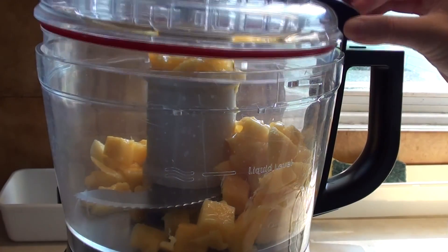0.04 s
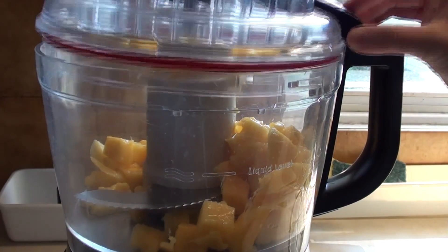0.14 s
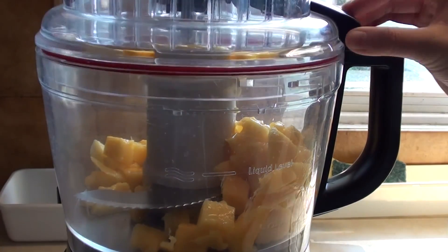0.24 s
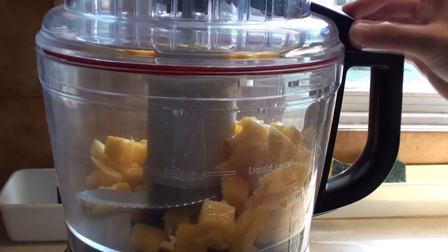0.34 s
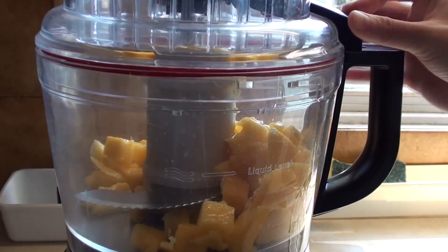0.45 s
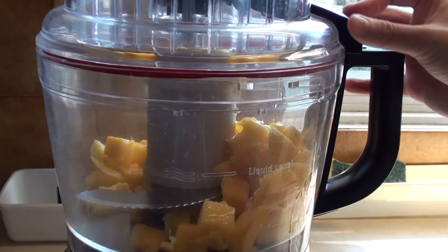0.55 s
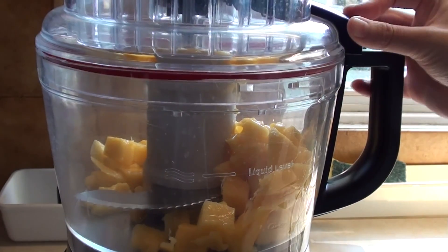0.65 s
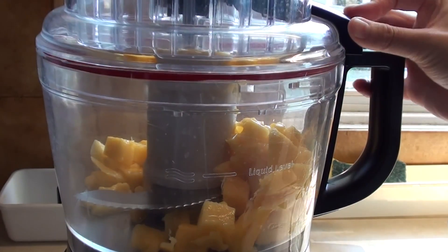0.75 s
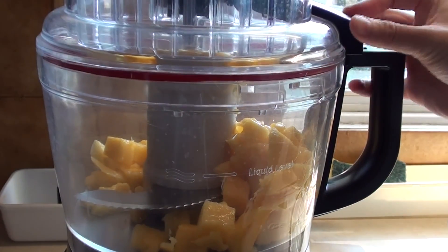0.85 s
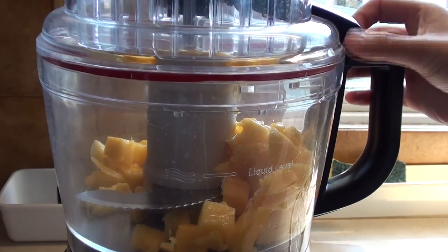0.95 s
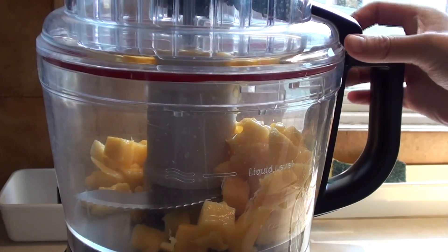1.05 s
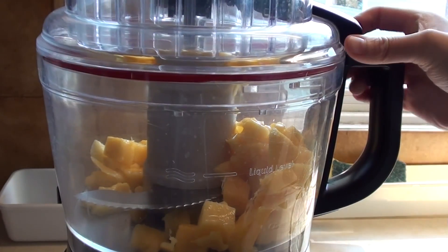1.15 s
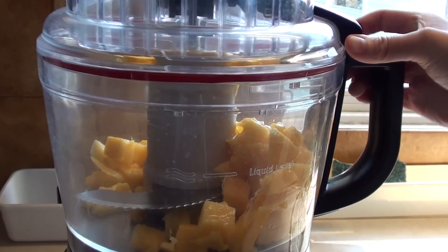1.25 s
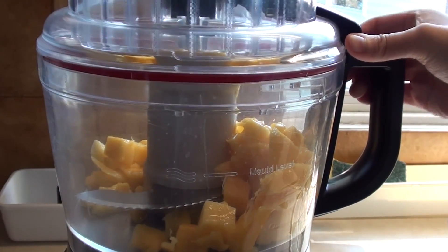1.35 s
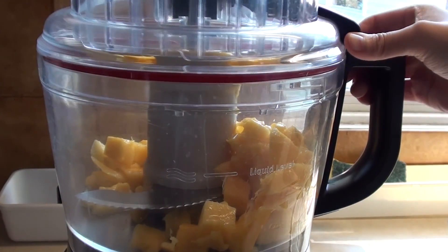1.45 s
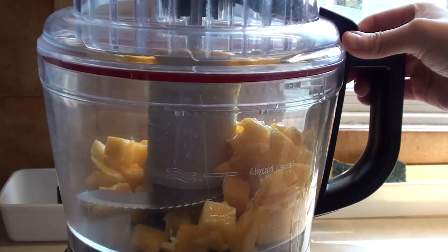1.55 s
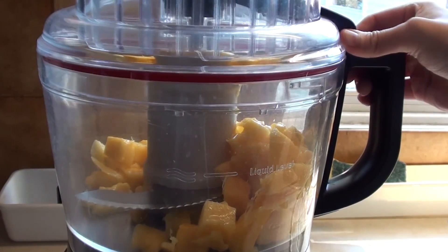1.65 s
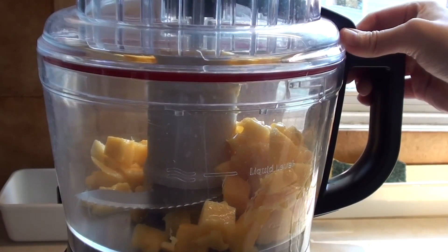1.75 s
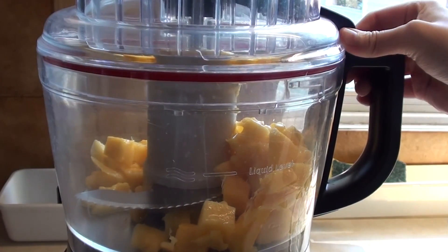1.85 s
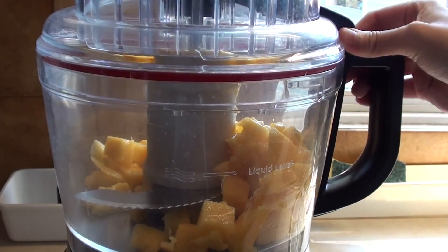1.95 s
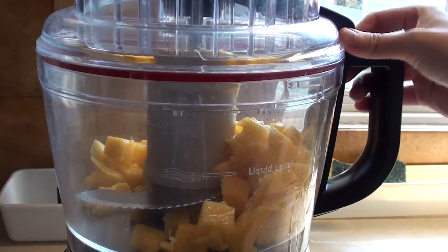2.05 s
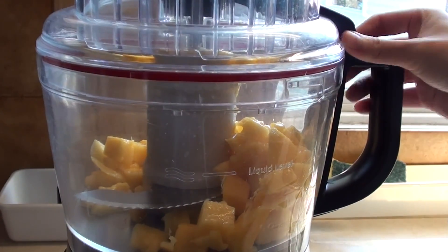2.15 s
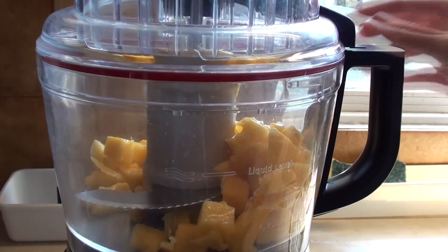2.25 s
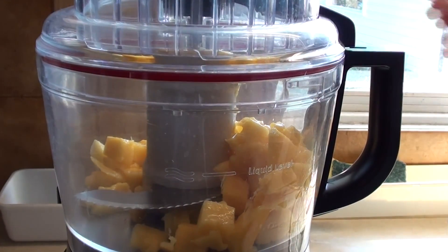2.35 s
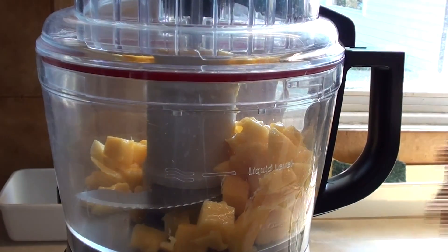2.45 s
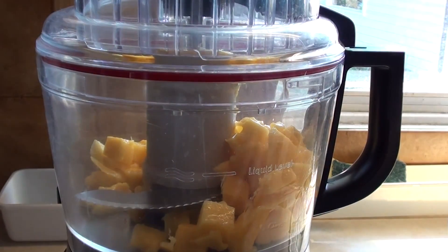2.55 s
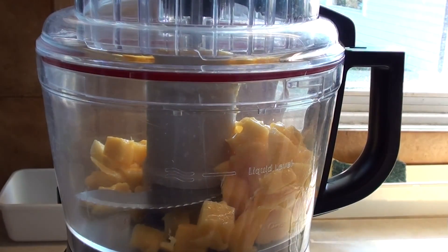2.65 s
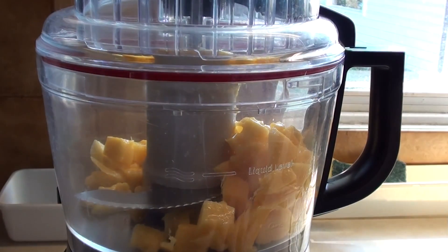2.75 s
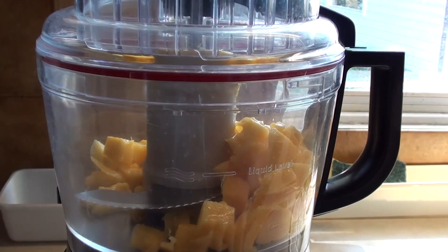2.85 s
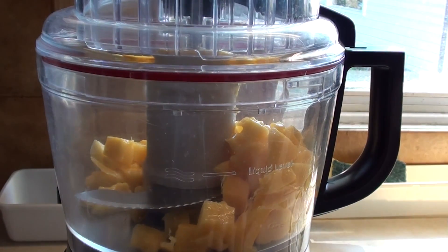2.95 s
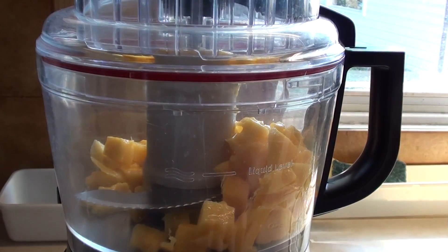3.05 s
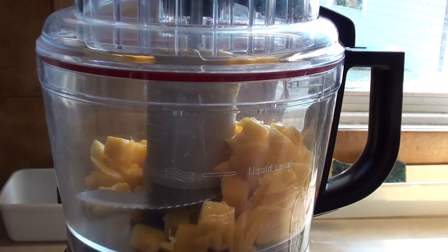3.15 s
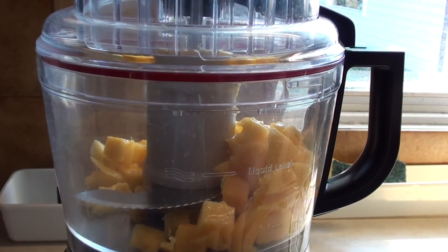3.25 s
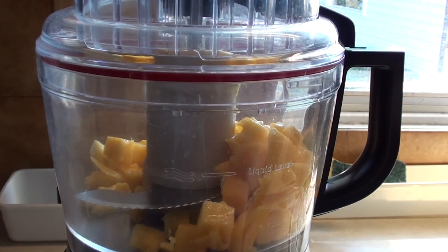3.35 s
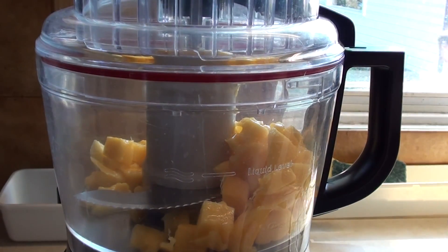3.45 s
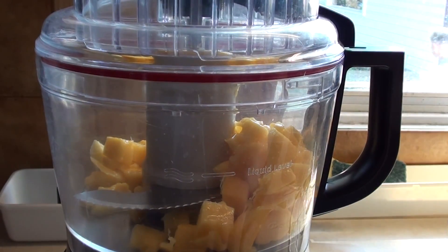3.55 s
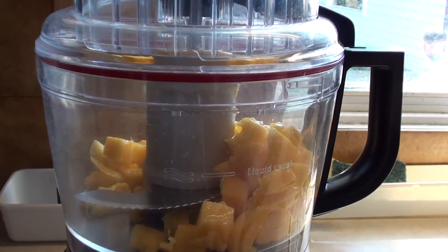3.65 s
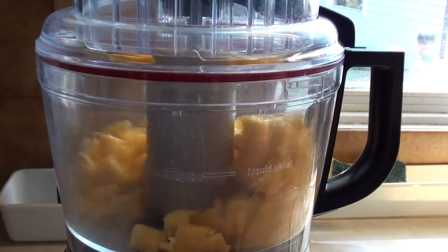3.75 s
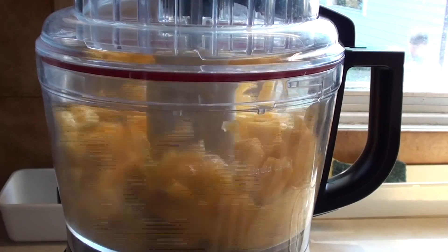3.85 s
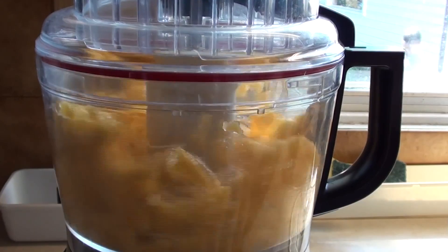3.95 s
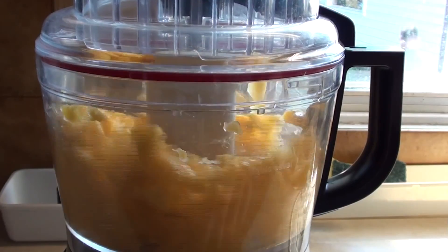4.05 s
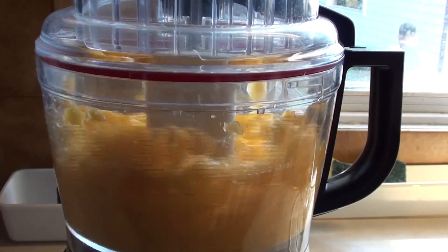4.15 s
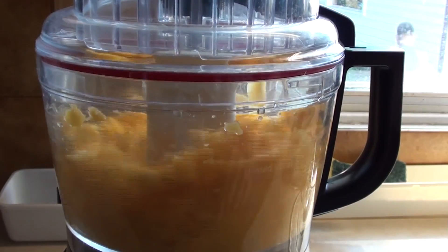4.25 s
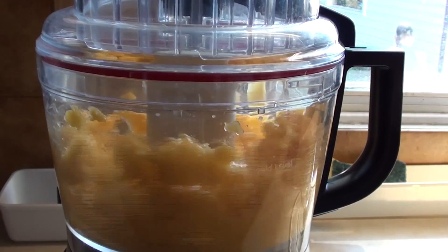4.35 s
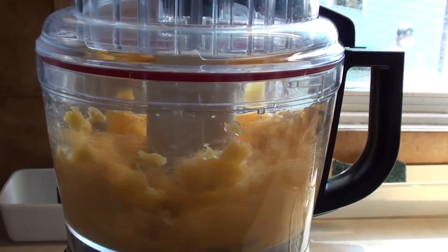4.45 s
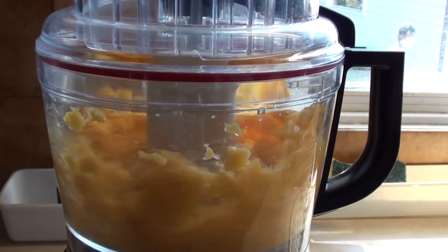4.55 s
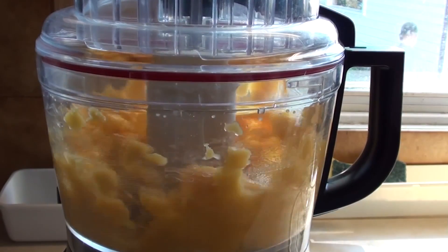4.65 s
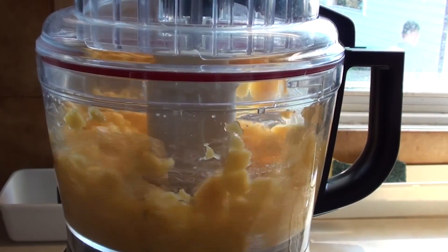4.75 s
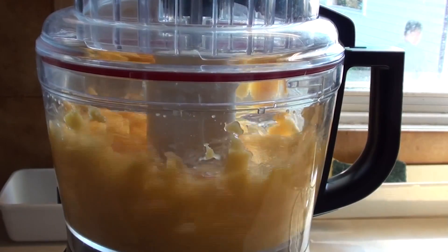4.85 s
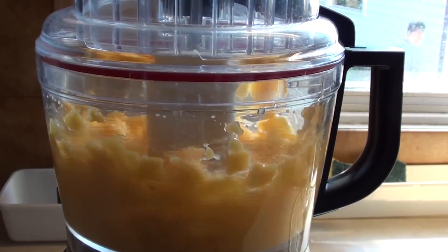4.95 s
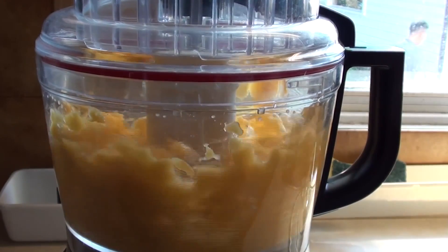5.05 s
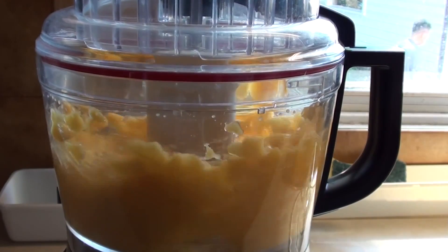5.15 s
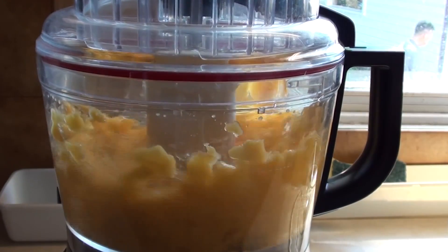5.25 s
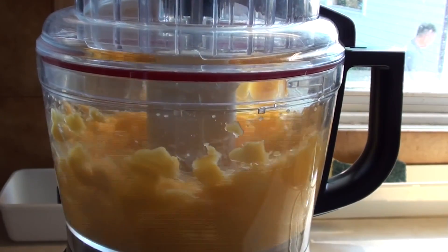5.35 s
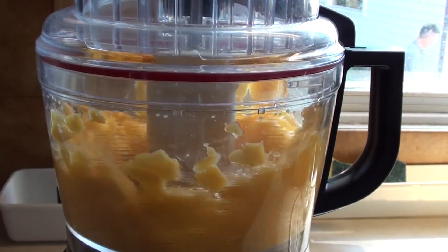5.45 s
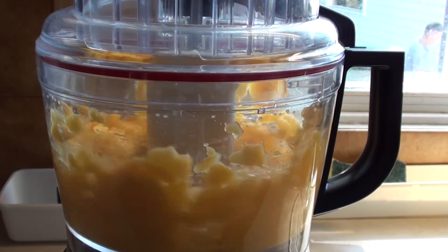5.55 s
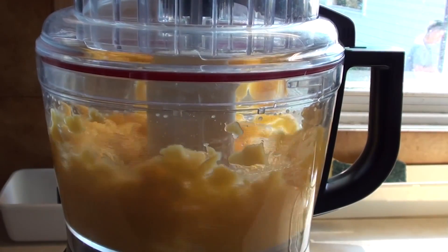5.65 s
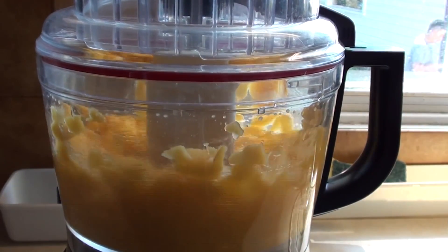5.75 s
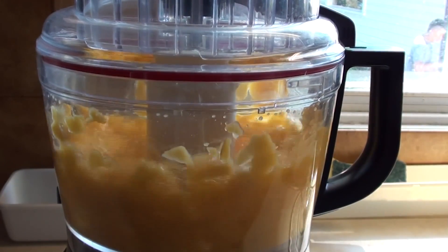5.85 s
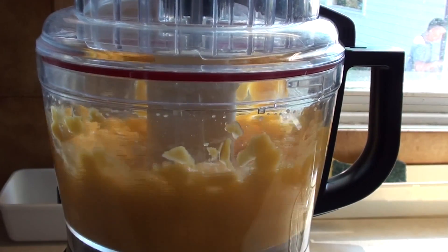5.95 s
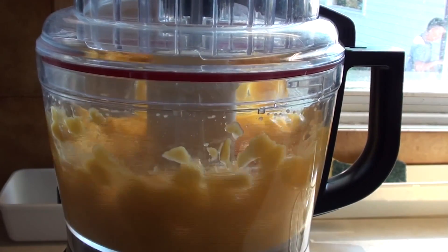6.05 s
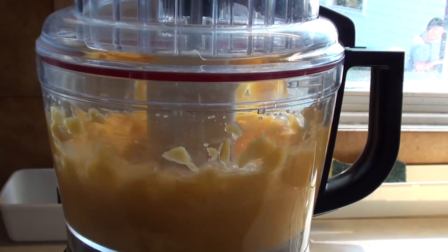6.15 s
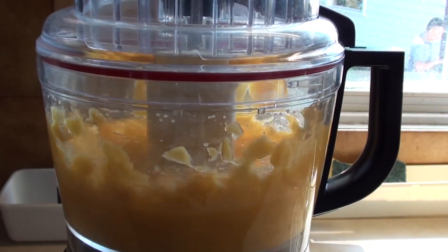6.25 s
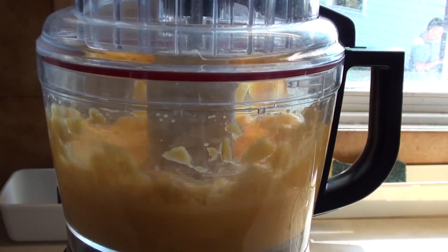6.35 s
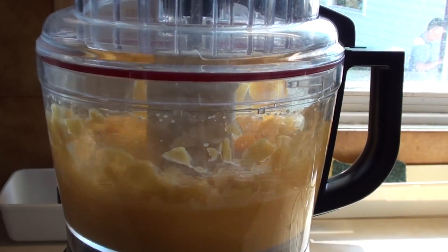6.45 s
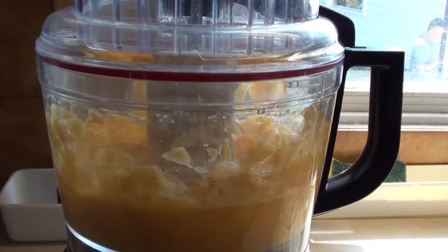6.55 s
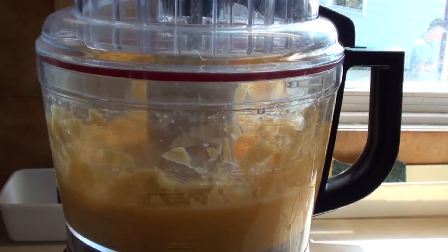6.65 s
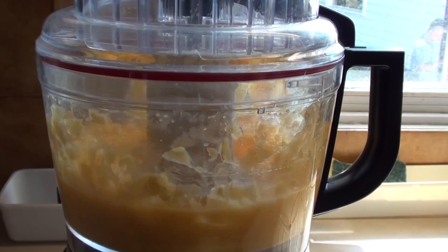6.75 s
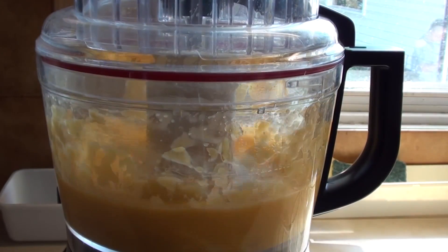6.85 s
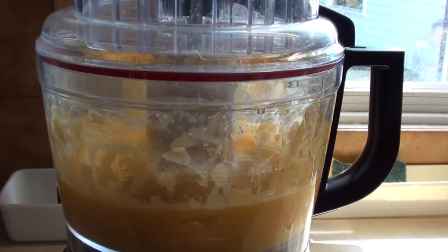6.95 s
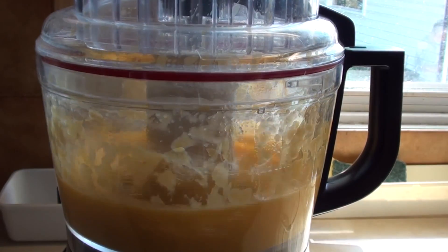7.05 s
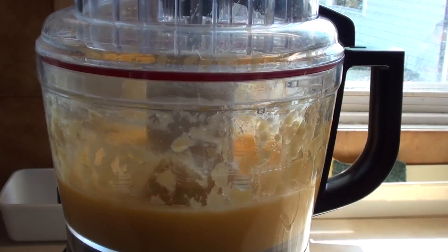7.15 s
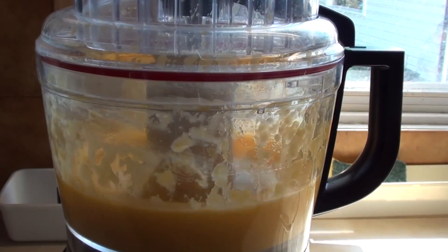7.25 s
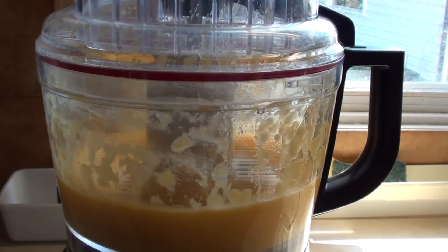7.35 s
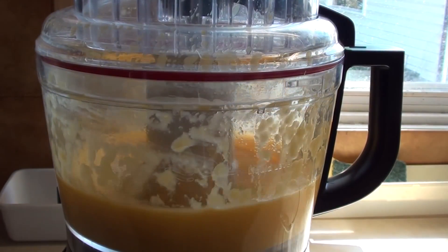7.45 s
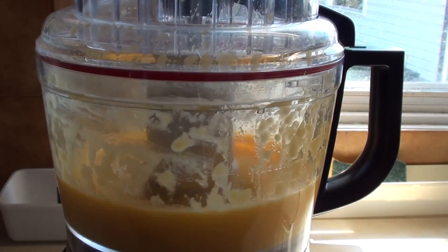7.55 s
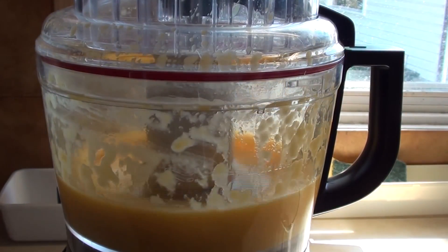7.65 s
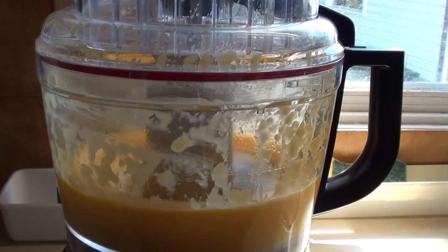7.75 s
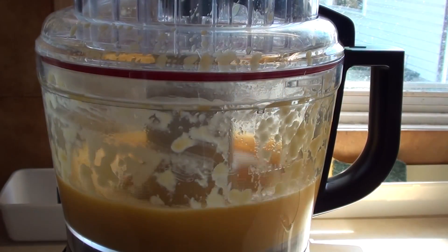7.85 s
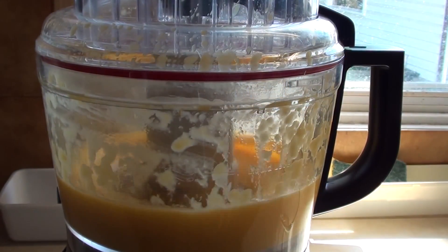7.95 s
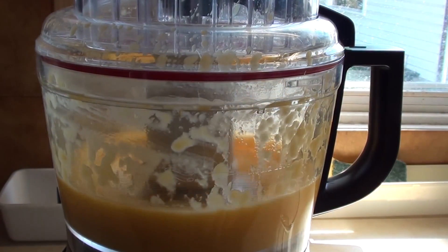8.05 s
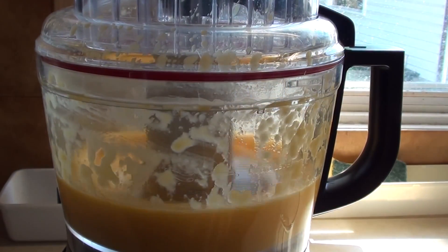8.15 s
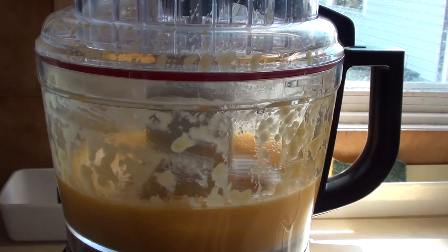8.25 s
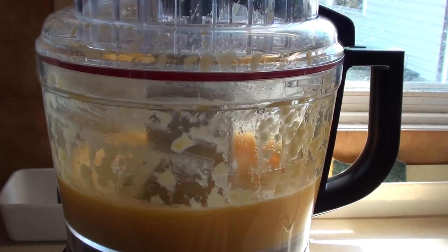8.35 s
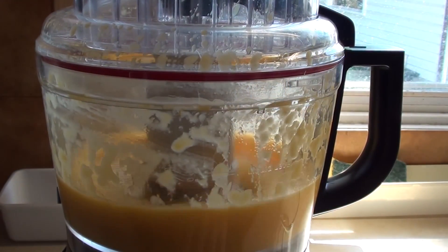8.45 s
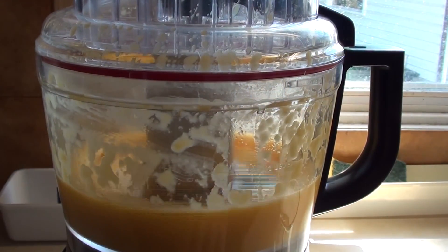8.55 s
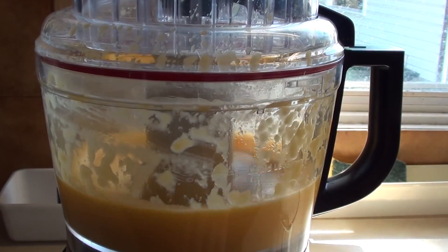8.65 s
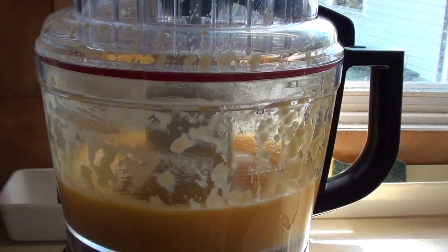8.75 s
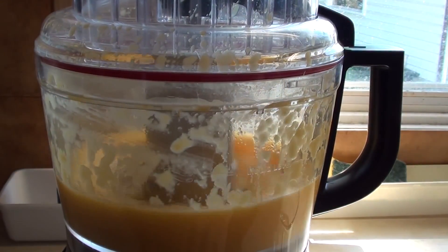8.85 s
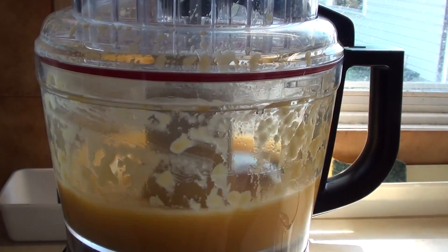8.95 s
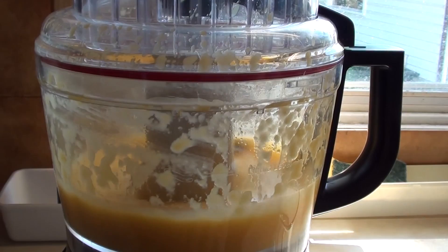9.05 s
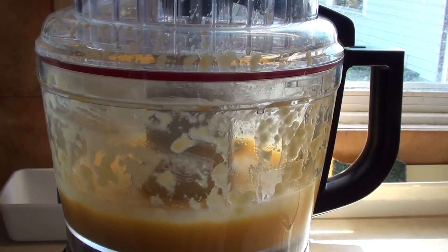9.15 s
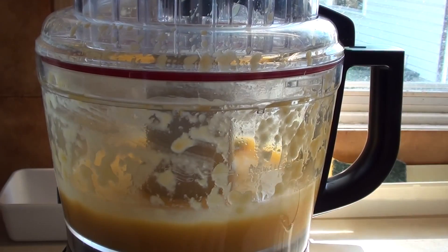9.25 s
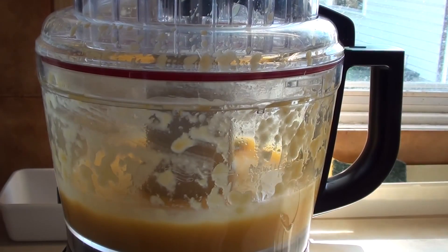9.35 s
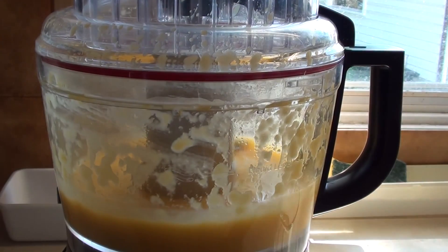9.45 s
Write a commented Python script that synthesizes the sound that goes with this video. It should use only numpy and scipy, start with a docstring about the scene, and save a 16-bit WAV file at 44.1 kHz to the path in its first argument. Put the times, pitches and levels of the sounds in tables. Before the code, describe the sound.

Irregular sharp plastic knocks and hollow bowl rings come first, with pauses, over faint room hiss. A dull button click starts a steady food processor motor, its fuzzy belt whine and metallic rasp mixed with lumpy wet churning and small squelches. The fruit liquefies and the sound becomes smoother and more rhythmic before a brief coast-down, light clacks and a soft swish, closely miked in a small kitchen.

```python
"""A food processor on a kitchen counter, heard by close microphones over faint room hiss.
First the hard plastic lid rubs, knocks, twists and latches (noise crunches, ringing bowl and tab); a hand swishes.
A button thumps the base, then for five seconds a motor hums in steady sines and drives the blade by a toothed belt:
a fuzzy harmonic whine and rasping metal, while noise splats of fruit chunks and gliding squelches turn to puree wash.
The drive runs down with a few clacks and the puree settles with a last soft swish."""
import sys
import numpy as np
from scipy import signal
from scipy.fft import rfft, irfft
from scipy.io import wavfile
from scipy.ndimage import uniform_filter1d

SR = 44100
rng = np.random.default_rng(int(sys.argv[2]) if len(sys.argv) > 2 else 0)


def output_pcm(signal):
    """Save a mono or channel-first signal as 16-bit PCM at the path in sys.argv[1].

    Samples are clipped to [-1, 1] before scaling.
    """
    pcm = np.clip(np.atleast_2d(signal).T, -1, 1) * 32767
    wavfile.write(sys.argv[1], SR, np.round(pcm).astype(np.int16))


N = 419391
TIME = np.arange(N) / SR  # s

ON_S, OFF_S, COAST_S = 3.75, 8.85, .39  # motor current on and off, then the time the drive takes to stop
BELT_TEETH = 43  # in one loop of the belt


def amp(db):
    """Decibels to amplitude."""
    return 10 ** (np.asarray(db) / 20)


def unit(x):
    """Scales a signal to an RMS of one."""
    return x / np.sqrt(np.mean(x ** 2) + 1e-20)


def at_hz(points, hz):
    """Reads a table on a log-frequency axis."""
    f, value = np.transpose(points)
    return np.interp(np.log(hz + 1), np.log(f + 1), value)


def curve(rows):
    """Reads a time table at every sample."""
    return np.interp(TIME, *np.transpose(rows))


def between(on, off, rise, fall):
    """A gate with sloping ends; all in seconds."""
    opening = np.clip((TIME - on) / rise, 0, 1)
    closing = np.clip((off - TIME) / fall, 0, 1)
    return opening * closing


def add(mix, s, sound):
    """Lays a short sound into the mix at s seconds."""
    part = mix[max(round(s * SR), 0):][:len(sound)]
    part += sound[:len(part)]


def wander(hz):
    """Slow random drift of unit RMS, low-passed near hz."""
    f = np.fft.rfftfreq(N, 1 / SR)
    spectrum = rfft(rng.standard_normal(N)) / (1 + (f / hz) ** 4)
    return unit(irfft(spectrum, N))


def colour(x, points, peaks=(), size=8192):
    """Causal minimum-phase filter: a broad spectrum plus resonances, brought to unit RMS."""
    f = abs(np.fft.fftfreq(size, 1 / SR))
    power = amp(at_hz(points, f)) ** 2
    for hz, width, db in peaks:
        power = power + amp(db) ** 2 / (1 + ((f - hz) / width) ** 2 * 2) ** 2
    log_gain = np.log(power + 1e-12) / 2
    taps = np.fft.ifft(np.exp(np.conj(signal.hilbert(log_gain)))).real
    return unit(signal.oaconvolve(x, taps[:size // 2])[:N])


def ring(modes):
    """Half a second of dying sines, each with its own pitch, level and t60."""
    t = TIME[:SR // 2]
    return sum(amp(db - 60 * t / t60) * np.sin(2 * np.pi * hz * t) for hz, db, t60 in modes)


def no_deep_bass(x):
    """The rubber feet of the base pass no deep bass: a high-pass at 175 Hz."""
    return signal.sosfilt(signal.butter(4, 175, "high", fs=SR, output="sos"), x)


def room_tone(level_db=-55, side_db=-15):
    """Faint hiss, nearly alike in both ears; its amplitude halves from 3.75 to 9.1 s."""
    # hiss of the room: f/Hz, level/dB per Hz
    hiss = [(20, -24), (60, -10), (100, -5), (160, 0), (260, 0), (600, 0), (1000, -1.5), (2000, -3.5),
            (5000, -7.5), (9000, -10), (13000, -11.5), (16000, -13)]
    side_hiss = [(30, -51), (200, -31), (1500, -20), (6000, -35), (9000, -59)]
    mid = colour(rng.standard_normal(N), hiss)
    side = amp(side_db) * colour(rng.standard_normal(N), side_hiss)
    dip = 1 - .5 * between(3.75, 9.1, .02, .02)
    return amp(level_db) * np.array([mid + side, mid - side]) * dip


def kitchen(x, wet_db, side_db):
    """Sparse reflections dying band by band; the close microphones hardly differ in the top octave."""
    # reverberation of the kitchen: f/Hz, t60/s
    room_t60 = [(150, 0.49), (500, 0.44), (1500, 0.38), (4000, 0.34), (7500, 0.36), (11000, 0.22),
                (16000, 0.21)]
    signs = rng.choice([-1., 1.], (2, SR))
    taps = signs * (rng.random((2, SR)) < 3000 / SR) * np.clip(TIME[:SR] / 0.012, 0, 1)
    hz, t, z = signal.stft(taps, SR, nperseg=256)
    decay = amp(-60 * t / at_hz(room_t60, hz)[:, None])
    tails = signal.istft(z * decay, SR, nperseg=256)[1]
    tails = tails / np.linalg.norm(tails[0])
    near = rng.standard_normal(SR // 100) * np.exp(-TIME[:SR // 100] / 0.0033)
    near = near / np.linalg.norm(near)
    wet, apart = amp(wet_db) * signal.oaconvolve(x[None], tails, axes=1)[:, :N]
    side = 0.45 * apart + amp(side_db) * signal.oaconvolve(x, near)[:N]
    side = signal.sosfilt(signal.butter(8, 8300, fs=SR, output="sos"), side)
    # the ears differ less in the bass
    side = side - 0.55 * signal.sosfilt(signal.butter(1, 600, fs=SR, output="sos"), side)
    return np.array([x + wet + side, x + wet - side])


def rim(db=-30, fade=0.051):
    """The lid rubs down into its seat: dying noise through the resonances of its rim."""
    # the lid's rim sliding onto the bowl: f/Hz, width/Hz, level/dB
    rim_peaks = [(396, 63, -4.5), (535, 41, -7), (595, 50, -7), (670, 50, -15), (830, 48, -17),
                 (997, 31, -4.5), (1330, 110, -19)]
    rub_colour = [(60, -24), (300, -11.5), (1500, -21.5), (2500, -34.5), (6000, -53), (16000, -70)]
    rub = colour(rng.standard_normal(N), rub_colour, rim_peaks)
    return amp(db) * rub * np.exp(-TIME / fade) * between(0, 0.097, 0.00067, .02)


def plastic(after_db=(-10, -11, -17, -22), after_t60=(.11, .10, .06, .035),
            trim_db=(0, -6.8, -2, 3), bowl_db=-15, counter_db=-27):
    """Each contact crunches, then the shell buzzes densely; the bowl rings on and the counter thuds."""
    # lid and latch knocks, a clack as the drive starts, and the belt's slaps once a loop as it runs down: t/s,
    # strength/dB, centre f/Hz, # breadth/octaves to 3 dB down, contact time/s
    hits = [(0.11, -27.0, 1700, 0.63, 0.008), (0.1195, -28.5, 1400, 0.84, 0.005),
            (0.1422, -23.0, 1600, 0.95, 0.0087), (0.1608, -20.5, 1700, 0.9, 0.0043),
            (0.1667, -27.5, 210, 1.9, 0.004), (0.1845, -25, 1300, 1.1, 0.0065),
            (0.206, -32.5, 1700, 1.3, 0.0057), (0.276, -23.0, 2100, 0.8, 0.0045),
            (0.4956, -45.5, 820, 1.4, 0.01), (0.5405, -36.5, 2000, 0.9, 0.00069),
            (0.5742, -29.5, 1600, 0.92, 0.0039), (0.5877, -19, 1190, 0.9, 0.0054),
            (0.5939, -24.5, 770, 1.42, 0.0052), (0.6006, -24.5, 1100, 0.77, 0.0014),
            (0.708, -37.0, 390, 1.2, 0.0064), (0.7394, -43.5, 1200, 1.3, 0.005),
            (0.843, -31.5, 2000, 0.69, 0.011), (0.9159, -46.5, 1700, 1.0, 0.006),
            (1.0645, -35.0, 3800, 1.0, 0.0028), (1.1359, -35.5, 1400, 0.86, 0.011),
            (1.2125, -48, 300, 2.1, 0.016), (1.2738, -47.5, 480, 1.5, 0.004),
            (1.331, -33.5, 2700, 1.24, 0.0014), (1.362, -44, 3400, 1.0, 0.001),
            (1.382, -27.5, 760, 1.0, 0.0075), (1.4278, -31.5, 2000, 1.0, 0.0022),
            (1.467, -42, 150, 1.5, 0.0055), (1.4975, -33.5, 2600, 1.0, 0.0023),
            (1.5369, -29.5, 2500, 0.9, 0.0018), (1.5632, -32, 1400, 1.04, 0.0097),
            (1.571, -30.5, 1400, 1.0, 0.007), (1.5777, -34.0, 880, 2, 0.0034),
            (1.5923, -31.0, 2100, 0.8, 0.0041), (1.6265, -26.5, 2900, 2.1, 0.0074),
            (1.6582, -36.0, 2300, 1.2, 0.002), (1.682, -20.0, 1400, 0.76, 0.011),
            (1.687, -28, 1200, 1.5, 0.003), (1.7067, -21.5, 650, 1.05, 0.011),
            (1.9873, -46.0, 150, 2.2, 0.0056), (2.0157, -36.5, 2000, 1.06, 0.0018),
            (2.035, -34, 2100, 0.98, 0.0077), (2.0538, -36.5, 2000, 0.9, 0.0059),
            (2.0987, -39.5, 1700, 1.0, 0.011), (2.1185, -19.5, 1090, 0.93, 0.0037),
            (2.1553, -33, 1700, 1.26, 0.0055), (2.241, -22, 1090, 0.9, 0.0088),
            (3.7506, -36, 1500, 1.5, 0.015), (8.88, -37, 1700, 1.2, 0.005),
            (8.9728, -31.5, 1800, 1.14, 0.009), (8.991, -39.0, 1200, 1.0, 0.005),
            (9.0817, -33, 1400, 1.0, 0.011), (9.0909, -35.5, 990, 1.1, 0.015),
            (9.1576, -38.5, 1200, 1.15, 0.012)]
    # edges of the bands of a knock: f/Hz
    band_edges = [150, 850, 2800, 9000, 16000]
    # ringing of the lidded bowl: f/Hz, level/dB, t60/s
    bowl_modes = [(164, 2, 0.14), (200, 3.5, 0.085), (242, -4.5, 0.28), (343, -8, 0.11), (460, -5.5, 0.17),
                  (607, 0, 0.13), (690, -2, 0.1), (796, -26, 0.12), (883, 7, 0.26), (1017, 4, 0.079),
                  (1124, -28, 0.33), (1172, 0, 0.23), (1344, 7, 0.16), (1545, 3.5, 0.14), (1850, -24, .14),
                  (2090, -4, 0.23)]
    # the shell's own colour under every blow: f/Hz, level/dB per Hz
    shell = [(120, -6.5), (200, 3), (300, 3.5), (600, -5), (1400, 2), (2100, 0.5), (3000, -4.5), (4300, 2),
             (5500, 5.5), (7500, 4), (8700, -2), (11000, -10), (16000, -20)]
    t, out = TIME[:SR // 4], np.zeros(N)
    edges = np.array([band_edges[:-1], band_edges[1:]]).T
    bands = [signal.butter(4, pair, "band", fs=SR, output="sos") for pair in edges]
    band_hz = np.sqrt(edges.prod(axis=1))
    buzz = colour(rng.standard_normal(N), shell)
    counter = signal.butter(2, [45, 110], "band", fs=SR, output="sos")
    for s, db, hz, breadth, contact in hits:
        levels = db - 3 * (np.log2(band_hz / hz) / breadth) ** 2
        noise = buzz[rng.integers(SR, N - SR):][:len(t)]
        for k, band in enumerate(bands):
            crunch = np.exp(-t / max(contact, 1e-4))
            after = amp(after_db[k] - 60 * t / after_t60[k])
            part = signal.sosfilt(band, noise * (crunch + after))
            add(out, s, amp(levels[k] + trim_db[k]) * part / np.std(part[:SR // 100]))
        thud = unit(signal.sosfilt(counter, noise)) * np.exp(-t / 0.072)
        add(out, s, amp(levels[0] + counter_db) * thud)
    bowl = ring(bowl_modes)
    bowl = bowl / np.linalg.norm(bowl) * np.sqrt(band_edges[2] / SR)
    return out + amp(bowl_db) * 2 * signal.oaconvolve(out, bowl)[:N]


def latch_tab(at_s=0.845, db=-36.5):
    """The latch tab twangs as the lid twists: a few dying sines."""
    # the tab's twang: f/Hz, level/dB, t60/s
    tab_modes = [(997, 2.5, 0.14), (1443, 0, 0.1), (1860, -5, 0.086), (2080, -13, .08), (2660, -5, 0.089)]
    out = np.zeros(N)
    add(out, at_s, amp(db) * ring(tab_modes))
    return no_deep_bass(out)


def swishes():
    """Soft airy rubs of noise that swell and fade."""
    # the hand drawing away, the puree slumping: t/s, half length/s, level/dB
    rubs = [(2.405, 0.15, -58), (2.722, 0.39, -61), (9.253, 0.019, -47.5)]
    air_colour = [(100, -7), (1000, -1), (4000, -6.5), (7500, 3), (11000, -7), (16000, -9)]
    air = colour(rng.standard_normal(N), air_colour)
    return air * sum(amp(db) * np.exp(-((TIME - s) / length) ** 2) for s, length, db in rubs)


def start_button(at_s=3.632, base_db=-28.5, click_db=-19.5, click_fade_s=.0095):
    """The start button's travel clicks in dying noise and its blow rings the heavy base."""
    # the motor base, struck by the button: f/Hz, level/dB, t60/s
    base_modes = [(202, 0.5, 0.15), (371, -1.5, 0.051), (503, -13, 0.065), (660, -9, .08), (895, -15, .07),
                  (1260, -7, .05), (1650, -22, .04), (2010, -4, .04)]
    # the click of the button's travel: f/Hz, level/dB per Hz
    click_colour = [(100, -7), (350, 7), (550, 1), (900, 1), (1400, -8), (2300, -14), (4400, -31),
                    (7300, -25), (10000, -45), (16000, -52)]
    out, t = np.zeros(N), TIME[:SR // 10]
    click = colour(rng.standard_normal(N), click_colour)[-len(t):] * np.exp(-t / click_fade_s)
    add(out, at_s, amp(click_db) * click)
    add(out, at_s, amp(base_db) * ring(base_modes))
    return no_deep_bass(out)


def liquid_share(start_s=6.1, takes_s=1.15, before=0.0502, after=.92):
    """How far the fruit has turned to liquid, 0-1; it turns in one stretch."""
    done = np.clip((TIME - start_s) / takes_s, 0, 1)
    return np.clip(before + (after - before) * done, 0, 1)


def drive_speed(spin_up_s=.37, kick_lead_s=.045, coast_power=1.2, chunk_drag=.013):
    """Share of full speed: a jump into motion, a spin-up, slight drag from whole chunks, a coast to rest."""
    to_go = 1 - np.clip((TIME - ON_S + kick_lead_s) / spin_up_s, 0, 1)
    coasted = np.clip((TIME - OFF_S) / COAST_S, 0, 1)
    drag = 1 - chunk_drag * (1 - liquid_share())
    return (1 - to_go ** 2) * (1 - coasted ** coast_power) * drag


def hum(low_db=-49.5, inrush_db=3, fourth_db=-13, waver=0.08, pulse_hz=120):
    """Mains harmonics, gently wavering, only while the current is on; the lowest is stronger at low speed."""
    # the line at three times the mains pulse rate fades once and returns stronger: t/s, level/dB
    third_line = [(3.9, -57), (4.05, -50.5), (5.3, -49), (6.3, -51), (6.62, -66), (7.05, -52), (7.6, -44.3),
                  (8.84, -42)]
    low, high = low_db + inrush_db * (1 - drive_speed()), curve(third_line)
    lines = 0
    for k, db in enumerate([low, high, high + fourth_db], 2):
        phase = 2 * np.pi * k * pulse_hz * TIME + 0.17 * wander(11)
        lines = lines + amp(db) * (1 + waver * wander(23)) * np.sin(phase)
    return np.sqrt(2) * lines * between(ON_S, OFF_S + .008, 0.011, 0.02)


def belt(teeth, slap, speed, orders_db=(-12, -8.5, -7, -16, -21), slip=.055, rasp=.5, slap_db=-7):
    """Teeth mesh unevenly: a fuzzy harmonic whine; the stiff spot slaps the housing once a loop."""
    # what the slap rings in the housing: f/Hz, width/Hz, level/dB
    housing_peaks = [(985, 55, -6.5), (1557, 87, 1.5), (1976, 230, -12.5)]
    turns = teeth + slip * wander(39)
    whine = 0
    for k, db in enumerate(orders_db, 1):
        fuzz = 1 + rasp * (wander(31) + 1j * wander(33))
        whine = whine + amp(db) * (fuzz * np.exp(2j * np.pi * k * turns)).real
    slap_colour = [(100, -53), (1500, -23), (8000, -61)]
    housing = colour(rng.standard_normal(N) * slap, slap_colour, housing_peaks)
    ping = sum(amp(db) * np.cos(2 * np.pi * hz * TIME + wander(29)) for hz, width, db in housing_peaks)
    knock = amp(slap_db) * housing + 1.7 * np.maximum(slap - 1, 0) * ping
    return whine * np.sqrt(slap) + knock * speed ** 4


def hub(teeth, slap, level_db=0.0, bite=0.35, flicker_db=1.62, throb=0.07):
    """Every tooth rasps the metal of the drive: pulsing noise that rings near 6 kHz."""
    # sharp resonances of the metal: f/Hz, width/Hz, level/dB
    metal_peaks = [(3080, 67, -12), (3540, 190, -14), (5170, 71, -13), (5780, 74, -8), (6090, 130, -1.5),
                   (6387, 64, 1.5), (6460, 70, -3), (6670, 110, -9), (7480, 240, -11.5), (11200, 330, -28)]
    # the broad hiss under them: f/Hz, level/dB per Hz
    metal_hiss = [(2000, -52), (4300, -27.5), (5300, -11.5), (6400, -8.5), (7600, -15), (8700, -19),
                  (10000, -23), (12000, -45), (14500, -36), (16000, -64)]
    pulses = 1 + bite * np.cos(2 * np.pi * teeth)
    wobble = 1 + throb * np.cos(2 * np.pi * teeth / BELT_TEETH * 3)  # three swells a loop
    flicker = amp(flicker_db * wander(110))
    rasp = rng.standard_normal(N) * pulses * wobble * flicker * slap ** 0.26
    return amp(level_db) * colour(rasp, metal_hiss, metal_peaks)


def churn(slap, liquid, chunks_db=-2, puree_db=-3.5, slosh_db=-20.5, liquid_slosh_db=-4,
          splats_per_s=700, splat_spread_db=2.5, wash=0.3):
    """Fruit is flung against the wall: separate splats, then a smoother wash; the mass sloshes below."""
    # whole chunks on the wall: f/Hz, level/dB per Hz
    chunk_colour = [(30, -23), (90, -14), (170, 5), (280, -2), (420, -5.5), (680, -6), (950, 2.5),
                    (1150, -5), (1340, 8), (1750, 0.5), (2100, 4), (2800, -4), (4300, -8), (16000, -26.5)]
    # smooth puree on the wall: f/Hz, level/dB per Hz
    puree_colour = [(30, -36), (90, -17), (190, -3.5), (320, 2.5), (450, -3.5), (680, -2.5), (950, 7.5),
                    (1180, 1.5), (1500, 8), (1800, -1), (2200, 2), (2800, -6.5), (4200, -8.5), (16000, -23)]
    sizes = amp(splat_spread_db * np.minimum(rng.exponential(1, N), 4))
    splats = rng.standard_normal(N) * sizes * (rng.random(N) < splats_per_s / SR)
    between_splats = wash * rng.standard_normal(N) * amp(2 * wander(64))
    chunks = colour(splats + between_splats, chunk_colour)
    puree = colour(rng.standard_normal(N) * slap ** .55, puree_colour)
    fruit = amp(chunks_db) * np.sqrt(1 - liquid) * chunks + amp(puree_db) * np.sqrt(liquid) * puree
    slosh_colour = [(30, -32), (100, -20.5), (150, 5), (200, 16.5), (280, -30), (800, -54)]
    slosh = colour(rng.standard_normal(N) * amp(2.9 * wander(25)), slosh_colour)
    # the pile first falls into the blade at 4 s and swells the sloshing by up to 4 dB
    tumble_db = 4 * np.exp(-((TIME - 4.0) / .06) ** 2)
    return fruit + amp(slosh_db + liquid_slosh_db * liquid + tumble_db) * slosh


def machine(slap_width=0.075, belt_db=-3.3, belt_power=.55, hub_power=1.9, fling_power=0.6):
    """One speed moves belt, hub and blade; each grows with a power of it, and all follow the effort."""
    # how hard the blade works against the fruit: t/s, level/dB
    effort_db = [(4.0, -36.5), (6.1, -36.5), (7.13, -41), (8.03, -38), (8.75, -39)]
    teeth_per_s, seam_s = 525, 8.063  # full speed without drag; one passing of the belt's stiff spot
    slap_chunks, slap_puree = .6, 2.8  # extra gain at the stiff spot, before evening
    coast_db = -1.5  # all is quieter once the motor stops pulling
    speed, liquid = drive_speed(), liquid_share()
    teeth = np.cumsum(teeth_per_s * speed) / SR
    loop = (teeth - np.interp(seam_s, TIME, teeth)) / BELT_TEETH
    stiff_spot = np.exp(-(((loop + .5) % 1 - .5) / slap_width) ** 2)
    slap = 1 + (slap_chunks + (slap_puree - slap_chunks) * liquid) * stiff_spot
    slap = slap / np.sqrt(uniform_filter1d(slap ** 2, size=SR // 4))  # evens the level over a quarter second
    whine = amp(belt_db) * belt(teeth, slap, speed) * speed ** belt_power
    drive = whine + hub(teeth, slap) * speed ** hub_power
    # chunks knock even at low speed; puree splashes only when fast
    fling = speed ** (fling_power + .5 * liquid)
    effort = amp(curve(effort_db) + coast_db * np.clip((TIME - OFF_S) / 0.063, 0, 1))
    return effort * (drive + churn(slap, liquid) * fling) * between(ON_S, OFF_S + COAST_S, 0.017, 0.03)


def squelches(count=70, db=-44, spread_db=-0.5, length=0.01294, glide=0.0995):
    """Air pockets squeezed out of the fruit give short gliding notes, as it turns to liquid."""
    # the biggest squelches under the blade: t/s, f/Hz, level/dB
    biggest = [(3.935, 1300, -33), (3.962, 1350, -41), (3.97, 2040, -45), (4.265, 1420, -40)]
    when, pitch, size = rng.random((count, 3)).T
    small_db = db + spread_db * (2 * size - 1) - 5 * pitch  # higher ones are fainter
    small = zip(3.9 + 2.9 * when, 950 * 2.9 ** pitch, small_db)
    t, out = TIME[:SR // 10] - .05, np.zeros(N)
    for s, hz, level in [*biggest, *small]:
        slope = rng.uniform(-0.3, 0.3) * t / length
        jitter = 0.37 * unit(uniform_filter1d(rng.standard_normal(len(t)), size=60))
        bend = 1 + glide * (slope + jitter)
        note = np.sin(2 * np.pi * hz * np.cumsum(bend) / SR)
        add(out, s + t[0], amp(level) * np.exp(-(t / length) ** 2) * note)
    return out


def scene():
    """Handling knocks and the running machine in the kitchen, with hum and room hiss added dry."""
    handling = plastic() + rim() + latch_tab() + start_button()
    knocks = kitchen(handling, wet_db=-12, side_db=-18.0)
    running = kitchen(machine() + squelches() + swishes(), wet_db=-10, side_db=-22)
    return knocks + running + hum() + room_tone()


def record(dry):
    """Limits the band with a steep low-pass at 15850 Hz."""
    low_pass = signal.firwin(511, 15850, window=("kaiser", 9), fs=SR)
    return signal.oaconvolve(dry, low_pass[None], "same")


dry = scene()
out = record(dry)
output_pcm(out)
```